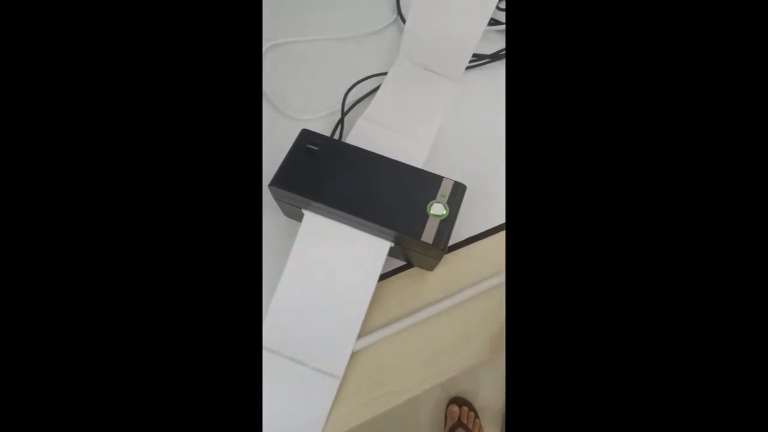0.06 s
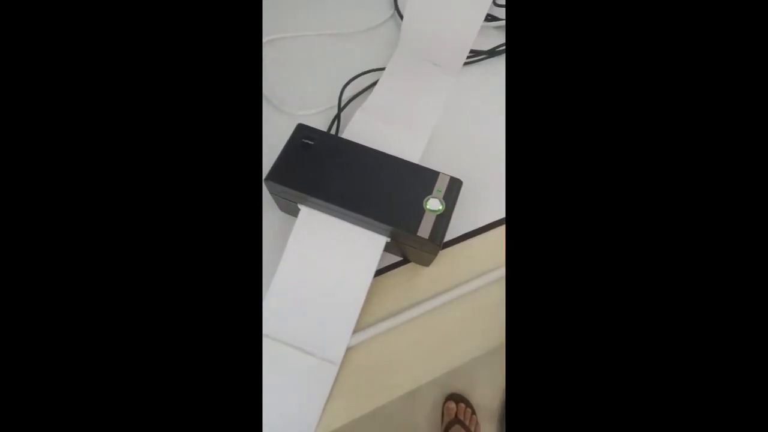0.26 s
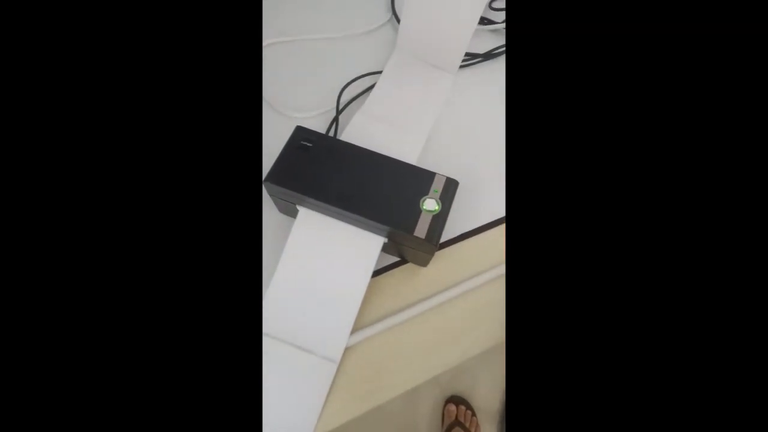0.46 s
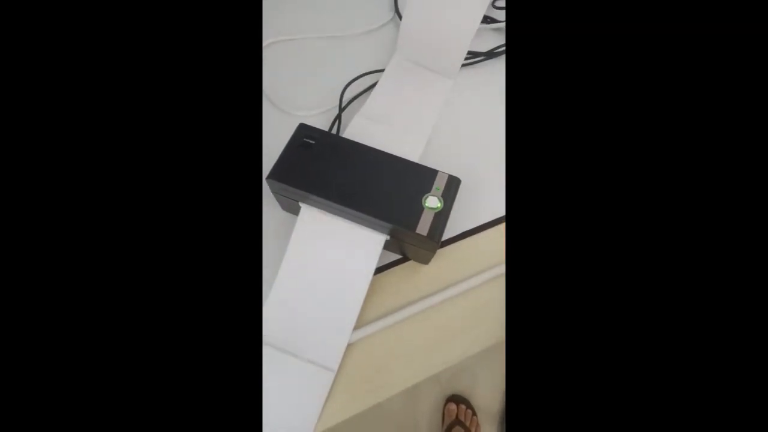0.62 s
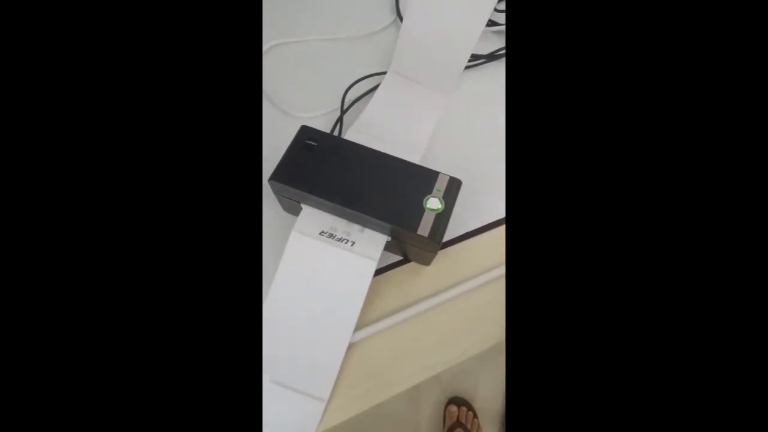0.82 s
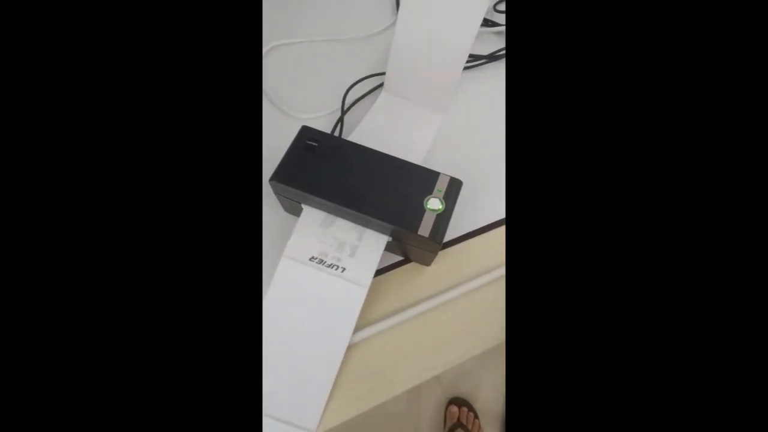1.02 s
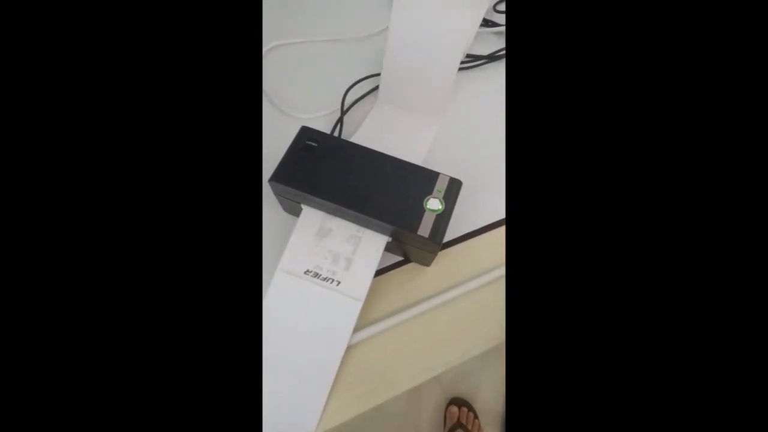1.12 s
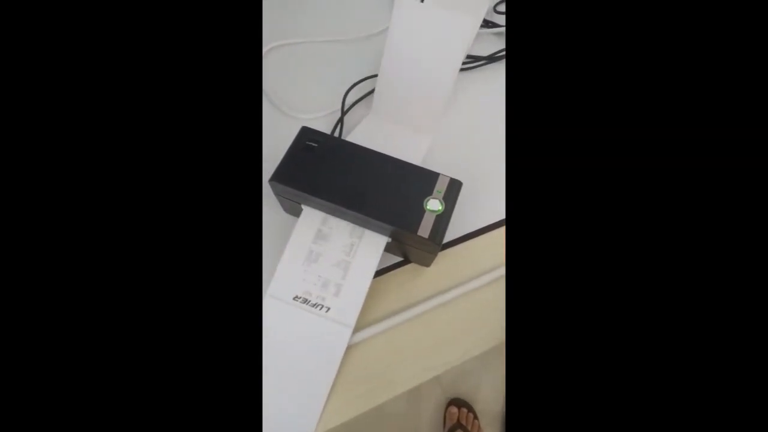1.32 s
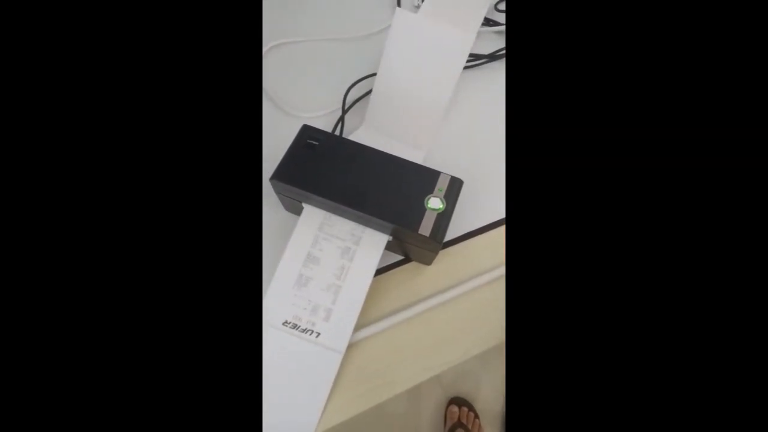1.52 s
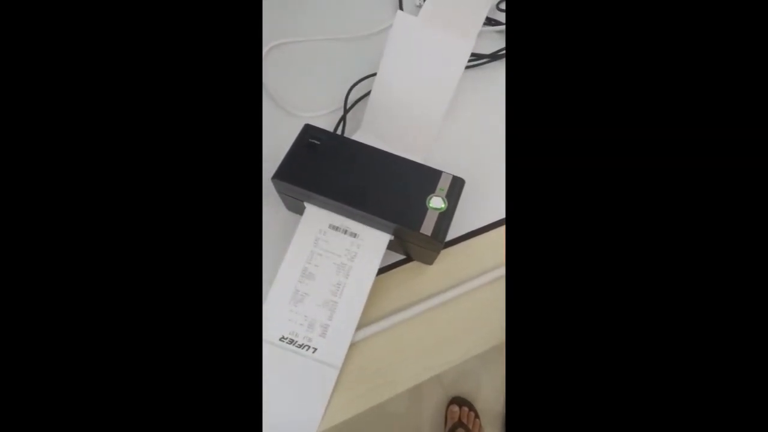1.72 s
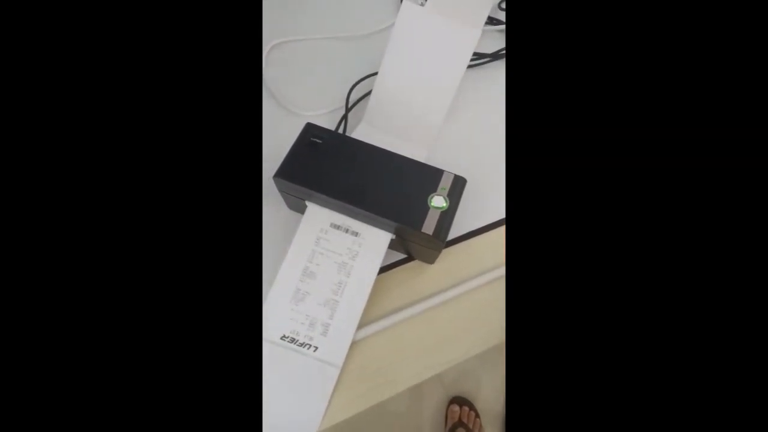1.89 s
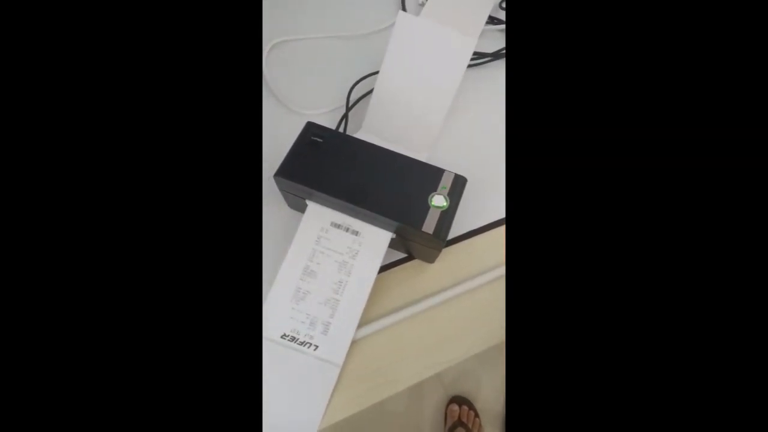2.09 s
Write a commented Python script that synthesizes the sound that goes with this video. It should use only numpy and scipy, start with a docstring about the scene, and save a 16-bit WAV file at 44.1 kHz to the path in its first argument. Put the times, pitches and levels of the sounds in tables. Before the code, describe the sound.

A small label printer on a desk clicks and chatters, pauses briefly, then runs with a rattling, whining motor buzz and papery hiss, stopping with sharp pops and a soft jolt in a quiet room, heard close.

```python
"""A small thermal label printer on a desk, heard from above in a quiet room with faint air and hum.
Its stepper motor engages with a jolt and chatter, then draws the paper back; the stiff strip pops.
It runs up to speed and feeds out one label: step harmonics whine, noise shaken by the steps rattles,
filtered noise hisses and scrapes, and the desk rumbles. The strip flaps and the case jolts at the stop.
Pops and jolts are damped sines; noise tails make the room."""
import sys
import numpy as np
from scipy import signal
from scipy.fft import rfft, irfft, next_fast_len
from scipy.io import wavfile
from scipy.ndimage import map_coordinates

SR = 44100
rng = np.random.default_rng(int(sys.argv[2]) if len(sys.argv) > 2 else 0)


def waveform_to_disk(signal):
    """Save audio, clipped to [-1, 1], as 16-bit WAV at the path in sys.argv[1]."""
    frames = np.transpose(np.atleast_2d(signal))
    scaled = np.clip(frames, -1, 1) * 32767
    samples = np.round(scaled).astype(np.int16)
    wavfile.write(sys.argv[1], SR, samples)


N = 94815


def amp(db):
    """Decibels to gain."""
    return 10 ** (np.asarray(db) / 20)


def unit(x):
    """Scale to rms 1."""
    return x / np.sqrt(np.mean(x ** 2) + 1e-20)


def along(points, hz):
    """Interpolate (Hz, value) points on a log frequency axis."""
    f, v = np.transpose(points)
    return np.interp(np.log(hz + 1), np.log(f + 1), v)


def clock():
    """Time of each sample in seconds."""
    return np.arange(N) / SR


def level(rows):
    """Gain from (s, dB) points, -140 dB outside them."""
    s, db = np.transpose(rows)
    return amp(np.interp(clock(), s, db, left=-140, right=-140))


def wobble(knots_per_s):
    """A smooth random curve through normal-distributed knots."""
    return map_coordinates(rng.standard_normal(1024), [clock() * knots_per_s], mode='wrap')


def filtered(x, response):
    """Multiply the spectrum of x by a response of frequency."""
    m = next_fast_len(N + SR // 2)
    return irfft(rfft(x, m) * response(np.fft.rfftfreq(m, 1 / SR)), m)[..., :N]


def pan(left_minus_right_db):
    """Left and right gains for a level difference."""
    return amp(np.array([[.5], [-.5]]) * left_minus_right_db)


def noise(colour):
    """Coloured stereo noise of rms 1, alike in the bass and independent in the treble."""
    # left-right correlation: pitch_hz, likeness (0 to 1)
    likeness = [(100, 1), (250, 1), (500, 0.71), (1200, 0.18), (2500, 0), (9000, 0)]

    def mid_side(hz):
        turn = np.arccos(np.clip(along(likeness, hz), -1, 1)) / 2
        return amp(along(colour, hz)) * [np.cos(turn), np.sin(turn)]

    mid, side = filtered(rng.standard_normal((2, N)), mid_side)
    return unit(np.array([mid + side, mid - side]))


def ring(start_s, pitch_hz, t60_s, attack_s):
    """A damped sine: a struck resonance with a soft onset."""
    t = np.maximum(clock() - start_s, 0)
    return np.sin(2 * np.pi * pitch_hz * t) * amp(-60 * t / t60_s) * (1 - np.exp(-t / attack_s))


def air_and_hum():
    """Steady coloured noise and a low sine whose level and phase waver."""
    # spectrum of the air: pitch_hz, level_db
    air_colour = [(15, -46), (25, -7), (66, -14), (109, -3), (172, -9), (278, -6.5), (326, -8), (811, -15),
                  (879, -16.5), (1000, -13.5), (1390, -16), (1500, -16), (1760, -18), (3350, -19.5),
                  (6040, -36.5), (10600, -38.5), (15000, -78)]
    air_db, hum_hz, hum_db, hum_waver_db = -61.5, 90, -67, 2
    hum_gain = amp(hum_db + hum_waver_db * wobble(8.96))
    hum = hum_gain * np.sin(2 * np.pi * hum_hz * clock() + wobble(9))
    return (amp(air_db) * noise(air_colour) + hum) * pan(-5.0)


def room(x):
    """Convolve each channel with its own diffuse noise tail, shorter in the top treble and the bass."""
    # decay of the room: pitch_hz, t60_s
    decay = [(100, 0.24), (500, 0.97), (3000, 0.66), (8000, 0.65), (15000, 0.28)]
    hz, t, z = signal.stft(rng.standard_normal((2, SR // 2)), SR, nperseg=256)
    decaying = z * amp(-60 * t / along(decay, hz)[:, None])
    tail = signal.istft(decaying, SR, nperseg=256)[1]
    tail = np.pad(tail, ((0, 0), (SR // 200, 0)))  # 5 ms before the tail
    return signal.fftconvolve(x, tail / np.linalg.norm(tail[0]), axes=1)[:, :N]


def rumble():
    """The desk rumbles under the running motor: low noise with a few broad peaks."""
    # level of the rumble: time_s, level_db
    rumble_level = [(.25, -79), (.32, -62), (.48, -68.5), (.58, -74), (.68, -67), (.92, -61), (1.25, -65.5),
                    (1.45, -66), (1.75, -69), (1.95, -79)]
    # spectrum of the rumble: pitch_hz, level_db
    rumble_colour = [(25, -31), (46, 10.5), (65, -13), (92, 10.5), (115, -14), (140, 4), (175, -1.5),
                     (205, -24), (255, -5), (400, -31.5)]
    return level(rumble_level) * noise(rumble_colour)


def case():
    """Every change of pull jolts the plastic case on the desk, ringing its modes."""
    # jolts of the case: start_s, level_db, deepest_mode_boost_db
    jolts = [(0.177, -39.5, -11), (.2, -56.5, 6), (.249, -45.5, 1), (.29, -46.5, 4), (.396, -51.5, 0),
             (0.486, -52, 5), (.638, -44.5, 6), (0.685, -43, -0.5), (1.789, -49.5, -19), (1.887, -49, 0.5),
             (1.973, -53.5, 6)]
    # modes of the case, deepest first: pitch_hz, level_db, t60_s
    modes = [(92.6, -6.5, 0.34), (165, -4.5, 0.19), (279.5, -7.5, 0.067), (388, -5, 0.032)]
    out = np.zeros(N)
    for start_s, jolt_db, deep_db in jolts:
        for k, (pitch_hz, mode_db, t60_s) in enumerate(modes):
            gain = amp(jolt_db + mode_db + deep_db * (k == 0))
            out += gain * ring(start_s, pitch_hz, t60_s, attack_s=0.0012)
    return out


def chatter(release_s, rough_db):
    """Short noise bursts of gear teeth knocking through their slack as the motor takes hold."""
    # bursts: start_s, level_db, length_s
    bursts = [(0.171, -55, 0.0094), (0.263, -53.5, 0.012), (0.279, -53, 0.024), (0.607, -49, 0.016),
              (0.625, -44.5, 0.013)]
    # spectrum of the bursts: pitch_hz, level_db
    chatter_colour = [(200, -1), (700, -3), (1600, -5), (2600, -2), (3500, -2), (4300, 0.5), (5000, -11.5),
                      (5600, -14.5), (6500, -18), (9000, -12.5), (12000, -32), (15500, -46)]
    t = clock()
    envelope = np.zeros(N)
    for start_s, level_db, length_s in bursts:
        attack = np.clip((t - start_s) / 0.0018, 0, 1)
        release = np.exp(-np.maximum(t - start_s - length_s, 0) / release_s)
        envelope += amp(level_db) * attack * release
    return envelope * unit(noise(chatter_colour) * amp(rough_db * wobble(450)))


def flaps(crackle_db):
    """The buckling strip pops: damped sines, each with a dull puff of noise."""
    # pops: start_s, level_db, pitch_hz, t60_s
    pop_rows = [(.2925, -38, 718, 0.029), (.311, -36, 393, 0.016), (.329, -41.5, 504, 0.073),
                (.343, -46, 628, 0.05), (.371, -45.5, 389, 0.047), (.394, -39, 643, 0.044),
                (.399, -37.5, 520, 0.056), (.419, -42.5, 388, 0.057), (.441, -45.5, 470, 0.072),
                (.452, -49.5, 262, 0.15), (.482, -49, 595, 0.037), (.6585, -27.5, 605, 0.0092),
                (.664, -37.5, 416, .02), (1.7105, -29.5, 1190, .012), (1.713, -40, 655, 0.05),
                (1.7205, -30.5, 713, 0.016), (1.7335, -22.5, 784, 0.012), (1.752, -43.5, 418, 0.03),
                (1.803, -41.5, 643, 0.032), (1.85, -47.5, 250, 0.15), (1.873, -42, 527, 0.034),
                (1.888, -47, 410, 0.033)]
    t = clock()
    pops, puff_envelope = np.zeros(N), np.zeros(N)
    for start_s, level_db, pitch_hz, t60_s in pop_rows:
        pops += amp(level_db) * ring(start_s, pitch_hz, t60_s, attack_s=0.00074)
        decay = amp(level_db - 60 * np.maximum(t - start_s, 0) / t60_s)
        puff_envelope += decay * np.clip((t - start_s) / 0.00037, 0, 1)
    puff_colour = [(100, -3), (400, -3), (800, -19.5), (1500, -2.5), (4000, -28), (10000, -73)]  # Hz, dB
    return amp(crackle_db) * puff_envelope * noise(puff_colour) - pops


def scrape():
    """The strip scrapes along as the label comes out: noise roughened by stick and slip."""
    # level of the scrape: time_s, level_db
    scrape_level = [(.7, -77), (.8, -86), (1.12, -67), (1.3, -54.5), (1.5, -55.5), (1.65, -53.5),
                    (1.72, -64), (1.76, -82)]
    # spectrum of the scrape: pitch_hz, level_db
    scrape_colour = [(500, -36), (1100, -9), (1400, -3), (1600, -2.5), (1850, -14), (3000, -41)]
    rough_db = 2.2
    return level(scrape_level) * unit(noise(scrape_colour) * amp(rough_db * wobble(130)))


def gears(angle, bite, rough_db):
    """Each step shakes the gear train, so noise pulses with the step angle; the paper hisses along."""
    # level of the rattle: time_s, level_db
    gear_level = [(.255, -64), (.275, -57), (.32, -71.5), (.37, -50.5), (.41, -65), (.45, -63), (.48, -105),
                  (.6, -87), (.615, -64), (.685, -63), (.725, -51), (.8, -55.5), (1.02, -54), (1.22, -53),
                  (1.4, -55), (1.68, -55), (1.77, -52.5), (1.8, -54), (1.85, -74)]
    # spectrum of the rattle: pitch_hz, level_db
    gear_colour = [(150, -7), (300, -18.5), (380, 4.5), (425, -0.5), (480, 3), (570, -1), (700, 5.5),
                   (860, 0), (1000, -5.5), (1300, -1.5), (1900, -4), (2330, 3), (2750, 0.5), (3070, 0.5),
                   (3250, 3.5), (3450, 0), (3750, -0.5), (4250, -5.5), (4750, -11), (5000, -9.5),
                   (5300, -19.5), (7000, -18.5), (15000, -41)]
    # spectrum of the paper hiss: pitch_hz, level_db
    hiss_colour = [(3000, -69), (5500, -9), (7000, -6.5), (8800, -2), (10500, -6.5), (12500, -13),
                   (15500, -60)]
    hiss_over_rattle_db, flutter_db = -10.5, .6  # flutter: slow unevenness of the drive
    steps = np.exp(bite * (np.cos(angle) + np.cos(2 * angle + 1) + 0.27 * np.cos(4 * angle)))
    unevenness = amp(rough_db * wobble(110) + flutter_db * wobble(12))
    rattle = unit(noise(gear_colour) * steps * unevenness)
    return level(gear_level) * (rattle + amp(hiss_over_rattle_db) * noise(hiss_colour))


def step_angle():
    """Phase of the step cycle: the integral of the motor speed."""
    # motor speed: time_s, step_cycles_hz
    speed = [(.255, 20), (.36, 110), (.385, 110), (.47, 20), (.6, 20), (.66, 105), (.7, 178),
             (.732, 199.65), (1.77, 199.65), (1.87, 60)]
    return 2 * np.pi * np.cumsum(np.interp(clock(), *np.transpose(speed))) / SR


def whine(angle, waver_db, jitter_rad, spread_rad):
    """Step harmonics waver with the load; the higher ones reach the two microphones out of step."""
    # feed harmonics: speed_multiple, level_db, left_minus_right_db
    harmonics = [(2, -66, -5), (3, -68, -1), (4, -69, -2), (8, -70, -6), (10, -69.5, -6), (11, -72, -3),
                 (12, -60.5, -2), (13, -65, -10), (14, -68.5, -7), (15, -70, -11), (16, -65.5, -8),
                 (17, -67, -9), (18, -71, -8), (19, -68, -11), (20, -72, -11), (21, -72, -11),
                 (25, -81, -12), (36, -84, -1), (39, -73.5, -1), (42, -80, 3)]
    # level of the sixth harmonic, the main whine: time_s, level_db
    sixth_level = [(.7, -78), (.716, -61), (.738, -53.5), (.77, -55), (.95, -60), (1.12, -57),
                   (1.26, -53.5), (1.45, -51.5), (1.585, -53), (1.598, -40.5), (1.628, -40), (1.638, -45),
                   (1.665, -50), (1.7, -54), (1.725, -62), (1.768, -56), (1.785, -72), (1.85, -90)]
    # momentary level changes of single harmonics: speed_multiple, centre_s, half_width_s, change_db
    swells = [(12, .73, .03, 5), (18, .738, .02, 12), (17, .93, .08, 6), (18, .93, .04, 6),
              (16, 1.2, .11, 7), (12, 1.22, .2, 3), (39, 1.27, .14, -6), (2, 1.6, .2, -5),
              (39, 1.67, .1, 2)]
    feed_start_s, feed_stop_s, feed_rise_s, feed_fall_db_per_s = 0.677, 1.756, 0.027, 175
    t = clock()

    def partial(order, depth_db):
        spread = min(order * spread_rad, np.pi / 3) + .2 * wobble(3.97)
        apart = np.array([[.5], [-.5]]) * spread
        swell_db = sum(db * np.exp(-((t - s) / width) ** 2) for k, s, width, db in swells if k == order)
        gain = amp(swell_db + depth_db * (wobble(15.98) + 0.77 * wobble(45.04)))
        phase = order * angle + 2 * np.pi * rng.random() + jitter_rad * wobble(30.07) + apart
        return np.sqrt(2) * gain * np.sin(phase)

    rise = np.clip((t - feed_start_s) / feed_rise_s, 0, 1)
    run = rise * amp(-feed_fall_db_per_s * np.maximum(t - feed_stop_s, 0))
    buzz = run * sum(amp(db) * pan(lean_db) * partial(k, waver_db) for k, db, lean_db in harmonics)
    return buzz + level(sixth_level) * pan(-3.5) * partial(order=6, depth_db=.8)


def scene():
    """The printer, mostly to the right, with its room echo, over air and hum."""
    # stereo lean of the noises and knocks: pitch_hz, left_minus_right_db
    lean = [(60, -2), (160, -3), (330, -7), (480, -6), (750, -3), (1200, -3), (2000, -4), (3300, -8),
            (4600, -11), (6000, -4), (9000, 1), (15000, 2)]
    # room level of the noises and knocks: pitch_hz, level_db
    wet = [(90, -18), (200, 0), (400, 7), (800, 1), (15000, -3.5)]
    angle = step_angle()
    knocks = flaps(crackle_db=-15) + scrape() + case()
    drive = rumble() + chatter(release_s=0.0052, rough_db=0.5) + gears(angle, bite=0.11, rough_db=2.5)
    tones = whine(angle, waver_db=2.0, jitter_rad=.25, spread_rad=0.07)
    echo = filtered(room(amp(-4) * drive + amp(-8.5) * knocks), lambda hz: amp(along(wet, hz)))
    body = filtered(drive + knocks + echo, lambda hz: pan(along(lean, hz)))
    return air_and_hum() + body + tones + amp(-16) * room(tones)


def record(dry):
    """The recorder drops the deepest bass and keeps nothing above its band limit."""
    low_hz, top_hz = 34.2, 15470
    return filtered(dry, lambda hz: (hz < top_hz) * (1 - 1 / (1 + (hz / low_hz) ** 6)))


dry = scene()
out = record(dry)
waveform_to_disk(out)
```